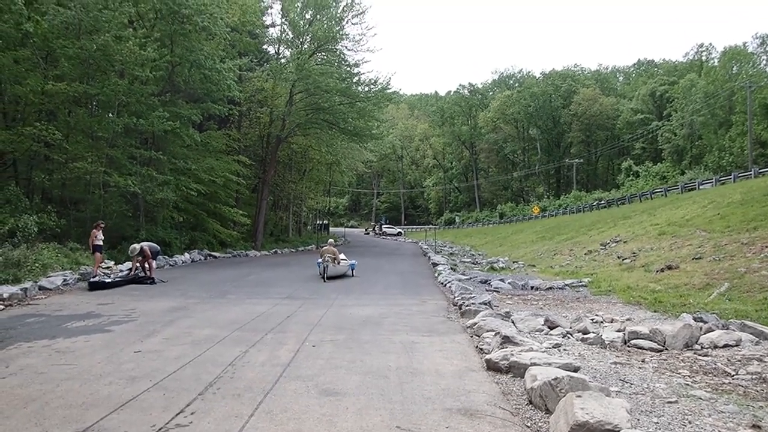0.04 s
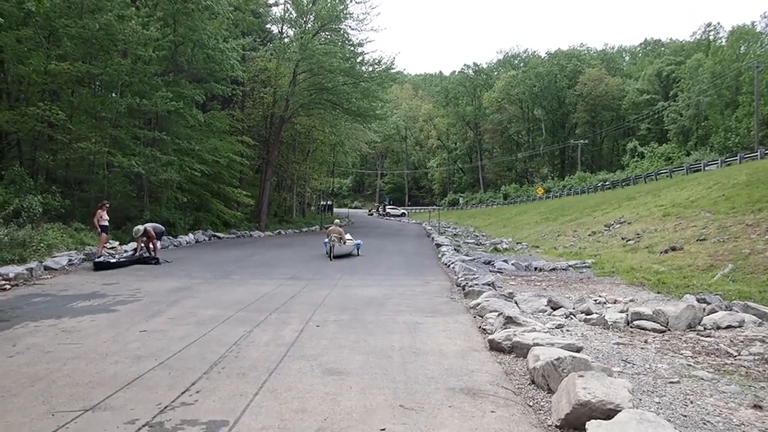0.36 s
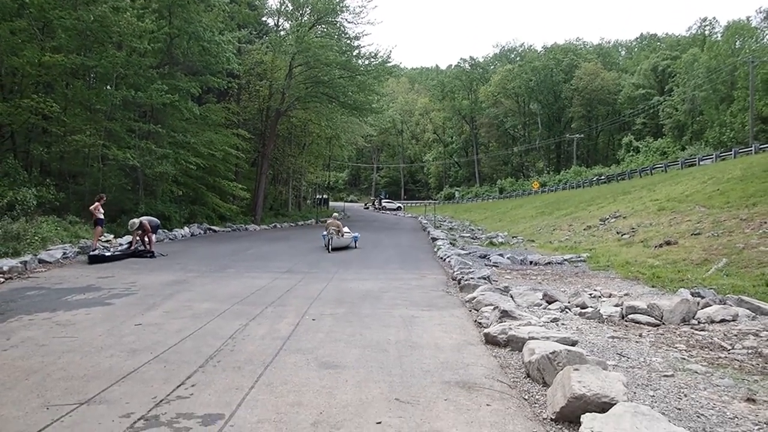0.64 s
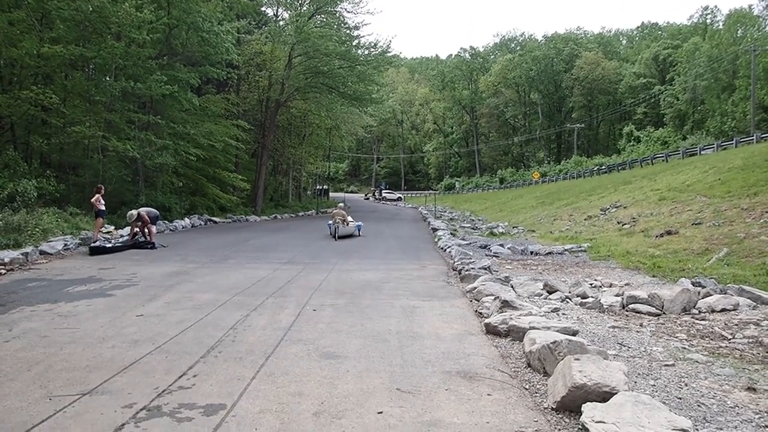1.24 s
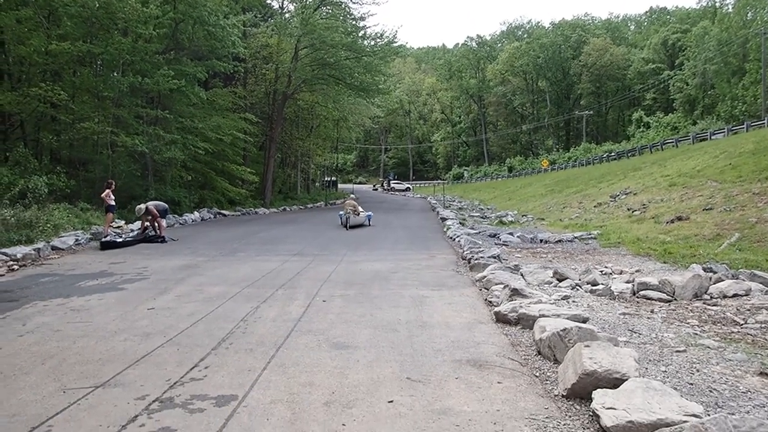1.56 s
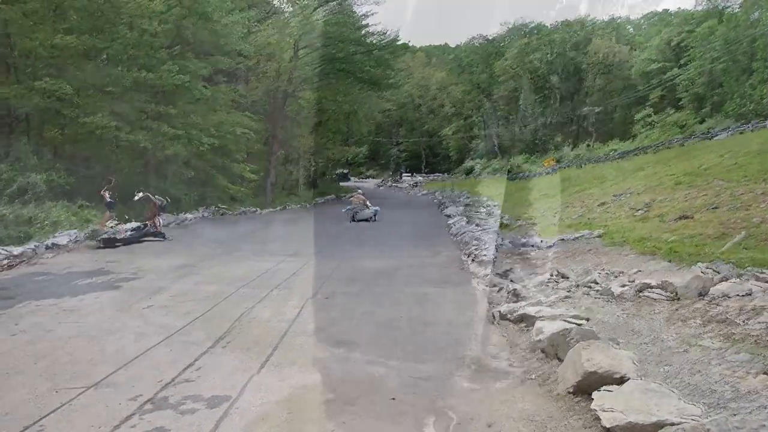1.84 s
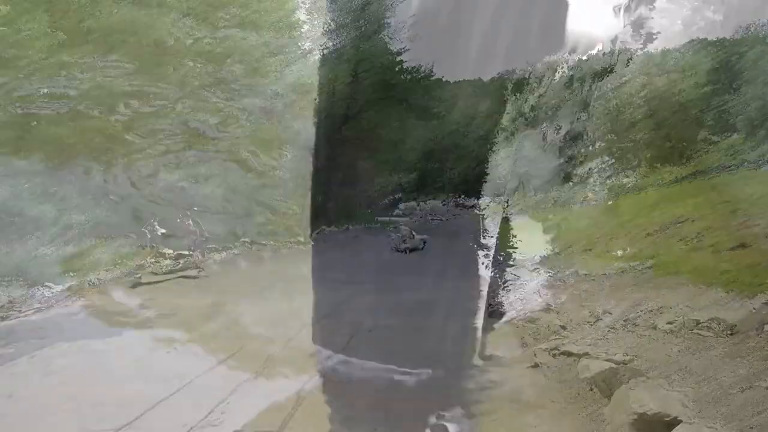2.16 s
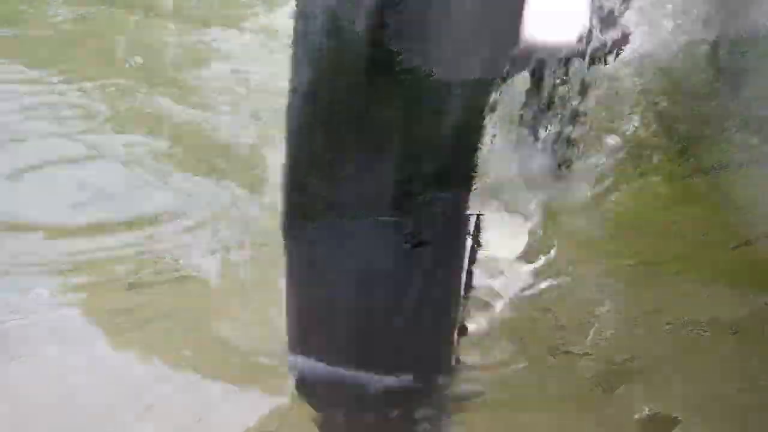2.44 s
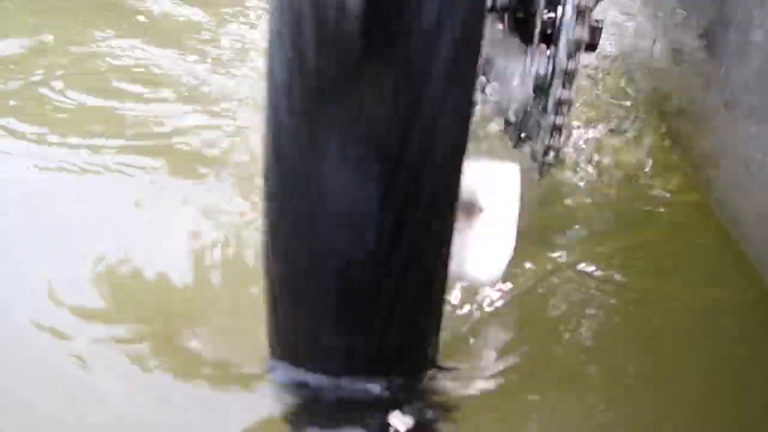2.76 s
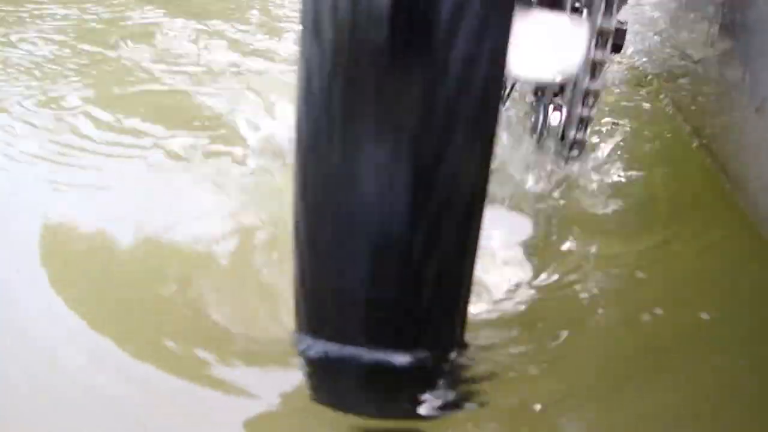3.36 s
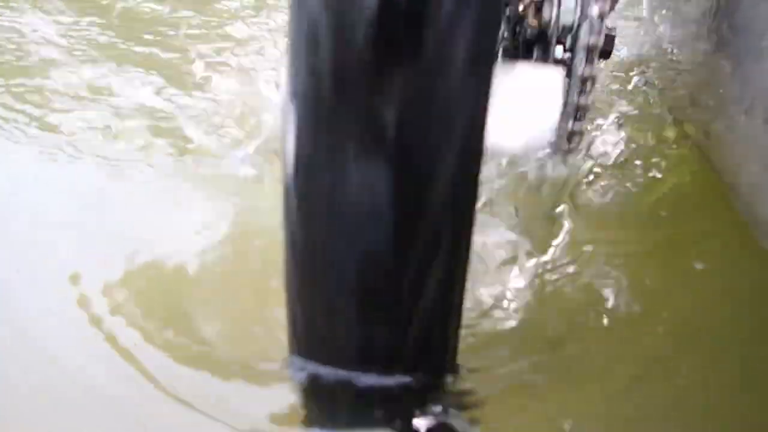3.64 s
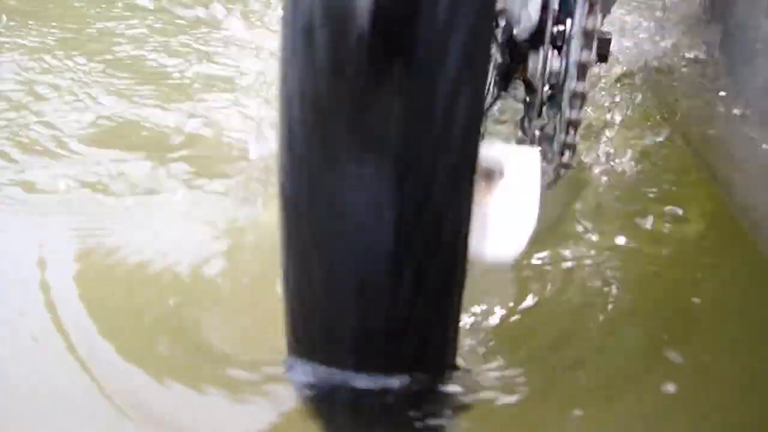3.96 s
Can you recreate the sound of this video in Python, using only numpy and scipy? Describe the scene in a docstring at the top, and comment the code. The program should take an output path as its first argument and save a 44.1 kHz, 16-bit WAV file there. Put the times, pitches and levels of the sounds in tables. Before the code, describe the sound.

A small craft's wheel churning water is the main sound. First the craft rolls on a ramp with a muffled rumble, throbbing about eight times a second and fading slightly, then stopping dead at 2 seconds. After a split second of silence, close splashing runs from 2.1 to 4 seconds, mostly on the right: irregular slaps, gulps, bubbles and spray over hollow hull drumming and the drive's low hum.

```python
"""A small wheeled craft churns water close by, mostly to the right. The water drums on its hollow hull
over the hum of the drive; wheel and chain throw up slaps and spray, which are impacts, and gulps
and bubbles, which are ringing pockets of air. Before this the craft rolls on a ramp for two seconds:
a muffled rumble whose rattle excites the body's resonances about eight times a second.
The rumble stops dead, and a short silence precedes the water."""
import sys
import numpy as np
from scipy import signal
from scipy.fft import rfft, irfft
from scipy.io import wavfile
from scipy.ndimage import uniform_filter1d

SR = 44100
rng = np.random.default_rng(int(sys.argv[2]) if len(sys.argv) > 2 else 0)


def bounce(signal):
    """Save signal as a 16-bit WAV file at the path given by the first command-line argument."""
    frames = np.transpose(np.atleast_2d(signal))
    limited = np.clip(frames, -1, 1)
    pcm = np.round(limited * 32767).astype(np.int16)
    wavfile.write(sys.argv[1], SR, pcm)


N = 176400

# Splashes off the wheel and chain: start_s, level_db, decay_s
WHEEL_SPLASHES = [(2.152, -13.5, 0.0036), (2.169, -18, 0.0065), (2.28, -23, 0.0043), (2.304, -19, 0.003),
                  (2.391, -22, 0.0031), (2.422, -16, 0.0098), (2.47, -22.5, 0.0078), (2.5024, -20, 0.0028),
                  (2.575, -17.5, 0.0032), (2.692, -24.5, 0.012), (2.745, -12, 0.0017),
                  (2.839, -18.5, 0.024), (2.961, -20, 0.004), (3.001, -20.5, 0.0075), (3.214, -22, 0.0062),
                  (3.25, -21, 0.028), (3.345, -21, 0.0055), (3.385, -18, 0.011), (3.527, -14.5, 0.0062),
                  (3.565, -21, 0.0065), (3.611, -12, 0.0025), (3.641, -23, 0.027), (3.651, -15, 0.002),
                  (3.779, -17.5, 0.011), (3.821, -18, 0.0045), (3.912, -13, 0.0051)]


def undb(db):
    """Amplitude ratio of a level in decibels."""
    return 10 ** (np.asarray(db) / 20)


def unit(x):
    """Normalisation to rms 1."""
    return x / np.sqrt(np.mean(x ** 2))


def on_bins(points):
    """Interpolation of (frequency_hz, value) points over log frequency, at every FFT bin."""
    hz, value = np.array(points, float).T
    order = np.argsort(hz)
    return np.interp(np.log(np.arange(N // 2 + 1) * SR / N + 1), np.log(hz[order]), value[order])


def colour(x, spectrum):
    """Minimum-phase filtering: folding the cepstrum makes the (frequency_hz, gain_db) response causal."""
    cepstrum = irfft(np.log(undb(on_bins(spectrum))), N)
    cepstrum[1:N // 2] *= 2
    cepstrum[N // 2 + 1:] = 0
    return irfft(rfft(x) * np.exp(rfft(cepstrum)), N)


def noise_gain(spectrum):
    """Rms gain of a filter for white noise, by Parseval's theorem."""
    return np.sqrt(np.mean(undb(on_bins(spectrum)) ** 2))


def walk(rate_hz):
    """Slow random modulation: smoothed random steps of rms 1."""
    hold = max(int(SR / rate_hz), 1)
    steps = np.repeat(rng.standard_normal(N // hold + 1), hold)
    return unit(uniform_filter1d(uniform_filter1d(steps, hold), hold)[:N])


def impacts(per_s, spread_db):
    """Shot noise: a Poisson train of impulses of uneven size and either sign, rms 1."""
    impulses = (rng.random(N) < per_s / SR) * rng.choice([-1, 1], N)
    return unit(impulses * undb(spread_db * np.minimum(rng.exponential(size=N), 4)))


def add(out, start_s, x):
    """Superposition of a short sound at its start time."""
    i = int(np.clip(start_s * SR, 0, N - 1))
    out[i:i + len(x)] += x[:N - i]


def bubble(hz, cycles, pitch_rise=0.069):
    """Damped oscillator: trapped air rings, rising in pitch as it decays by 40 dB."""
    age = np.linspace(0, 1, max(int(cycles / hz * SR), 2))
    turns = cycles * (age + pitch_rise * age ** 2 / 2)
    envelope = 1.84 * (1 - np.exp(-age / 0.089)) * np.exp(-np.log(100) * age)
    return envelope * np.sin(2 * np.pi * turns)


def hull_shadow(x, scatter_s=0.012, lag_samples=3):
    """Shadowing and scattering: the right faces the water; the left is shaded, late and partly diffuse."""
    # Left side relative to right: frequency_hz, gain_db
    shadow = [(60, 7), (110, -1.5), (200, -3.3), (300, -5.8), (700, -12), (1290, -17), (2380, -19),
              (4400, -20), (8120, -17), (15000, -26)]
    # Likeness of the two sides' phase: frequency_hz, likeness (1 = unscattered)
    phase_likeness = [(60, 0.69), (140, 0.55), (300, 0.56), (700, 0.13), (1500, 1), (3500, 0.056),
                      (12000, 0.088)]
    scatter = rfft(rng.standard_normal(N) * np.exp(-np.arange(N) / SR / scatter_s))
    diffuseness = 1 - np.clip(on_bins(phase_likeness), 0, 1)
    shade = undb(on_bins(shadow))
    right = rfft(x) * 2 / (1 + shade)
    left = right * shade * np.exp(1j * diffuseness * np.angle(scatter))
    return np.array([np.roll(irfft(left, N), lag_samples), irfft(right, N)])


def bubbles(fizz_count=600, low_hz=800, high_hz=3400, fizz_db=-39.5, cluster_s=0.01):
    """Bubble resonance: tight clusters of five clear rings over a fizz of faint ones."""
    # Bubble clusters: start_s, level_db, pitch_hz
    cluster_events = [(2.664, -18, 3090), (2.776, -16, 3430), (3.28, -16.5, 2900), (3.29, -23, 2830)]
    clusters, fizz = np.zeros(N), np.zeros(N)
    for start_s, db, hz in cluster_events:
        for late, detune in rng.random((5, 2)):
            ring = bubble(hz * np.exp(0.26 * (detune - 0.5)), cycles=20.4)
            add(clusters, start_s + late * cluster_s, undb(db) * ring)
    for when, pitch, faintness in rng.random((fizz_count, 3)):
        ring = bubble(low_hz * (high_hz / low_hz) ** pitch, cycles=16)
        add(fizz, when * N / SR, undb(-3 * np.log(faintness + 0.027)) * ring)
    return clusters + undb(fizz_db) * unit(fizz)


def droplets(count=520, low_hz=4480, high_hz=8620, scattered_db=-37):
    """Free oscillation: tiny drops ping at their own pitches, at random times and four to a splash."""
    def ping(pitch):
        return bubble(low_hz * (high_hz / low_hz) ** pitch, cycles=24)

    scattered, flung = np.zeros(N), np.zeros(N)
    for when, pitch, faintness in rng.random((count, 3)):
        add(scattered, when * N / SR, undb(-3 * np.log(faintness + 0.0054)) * ping(pitch))
    for start_s, db, decay_s in WHEEL_SPLASHES:
        for late, pitch in rng.random((4, 2)):
            add(flung, start_s + late * decay_s, undb(db - 7) * ping(pitch))
    return undb(scattered_db) * unit(scattered) + flung


def slosh(level_db=-31, surge_db=3):
    """Modulated shot noise: water tumbles round the tyre in uneven surges."""
    # Tumbling water: frequency_hz, gain_db
    spectrum = [(200, -20), (450, 5), (560, 9), (720, 7), (880, -5.5), (1050, 3), (1300, -2.5), (1500, 4.5),
                (1750, -7), (2400, -9), (4000, -41)]
    tumble = unit(colour(impacts(per_s=1800, spread_db=2), spectrum))
    return tumble * undb(level_db + surge_db * walk(35))


def spray(t, patter_db=-30.5, crackle_db=-34.5, attack_s=0.00082, drop_decay_s=0.0015):
    """Shot noise of drops: fine spray patters, bigger drops crackle, and each splash is a dense burst."""
    # Falling spray: frequency_hz, gain_db
    spectrum = [(600, -18), (1400, -18), (2200, -14), (2800, -7), (3650, -5.5), (4000, -17), (4400, -5.5),
                (4750, 0.5), (5350, 1), (6100, -2), (6650, -11), (7300, -8.5), (8100, -3.5), (9200, -20.5),
                (11600, -21), (13600, -16.5), (15500, -27)]
    patter = impacts(per_s=4500, spread_db=-0.5) * undb(patter_db + walk(60) + 2 * walk(20.6))
    big_drops = np.abs(impacts(per_s=110, spread_db=0.5))
    drop_tail = np.exp(-np.arange(SR // 20) / SR / drop_decay_s)
    envelope = undb(crackle_db) * unit(signal.fftconvolve(big_drops, drop_tail)[:N])
    for start_s, db, decay_s in WHEEL_SPLASHES:
        age_s = np.maximum(t - start_s, 0)
        envelope += undb(db) * (1 - np.exp(-age_s / attack_s)) * np.exp(-age_s / decay_s)
    bursts = envelope * impacts(per_s=7000, spread_db=1.3)
    return colour(patter + bursts, spectrum) / noise_gain(spectrum)


def slaps(t, decay_s=0.0017):
    """Impulsive excitation: a sheet of water hits the hull flat, and the brief force makes a wide-band crack."""
    # Hard slaps: start_s, level_db
    hits = [(2.152, -13), (2.283, -13.5), (2.418, -12), (2.538, -22.5), (2.778, -23), (3.110, -17),
            (3.183, -24), (3.246, -12), (3.643, -13.5), (3.911, -18)]
    # The crack: frequency_hz, gain_db
    spectrum = [(300, -24), (700, -5), (1500, 1), (3200, -6), (7000, -7), (15000, -19)]
    force = sum(undb(db) * (t >= start_s) * np.exp(-np.abs(t - start_s) / decay_s) for start_s, db in hits)
    return colour(force * rng.choice([-1, 1], N), spectrum) / noise_gain(spectrum)


def gulps(breakup_s=0.013, detune=0.43, plop_hz=633, cycles=7.8):
    """Cavity collapse: an air pocket plops and breaks into one strong bubble and five weaker followers."""
    # Air dragged under: start_s, level_db, pitch_hz
    pockets = [(2.138, -8.5, 1200), (2.150, -10, 1120), (2.233, -17, 1070), (2.255, -15, 1400),
               (2.279, -5.5, 1235), (2.391, -13, 820), (2.419, -6, 784), (2.538, -8.5, 1110),
               (2.691, -11.5, 1090), (2.778, -13, 930), (2.96, -10, 1120), (3.11, -9, 1020),
               (3.183, -13, 890), (3.218, -11.5, 1250), (3.245, -7.5, 1150), (3.345, -15, 1140),
               (3.373, -10, 1560), (3.463, -12, 1390), (3.508, -19, 810), (3.629, -9.5, 1430),
               (3.728, -12.5, 1230), (3.912, -8.5, 930)]
    out = np.zeros(N)
    for start_s, db, hz in pockets:
        ring_db, plop_db = db - 2.5, db - 8
        add(out, start_s, undb(ring_db) * bubble(hz, cycles))
        plop_s = start_s + breakup_s * rng.random() / 2
        plop = bubble(plop_hz * np.exp(detune * (rng.random() - 0.5)), cycles=7.4)
        add(out, plop_s, undb(plop_db) * plop)
        for late, pitch, faintness in rng.random((5, 3)):
            follower = bubble(hz * np.exp(detune * (2 * pitch - 1)), cycles)
            add(out, start_s + late * breakup_s, undb(ring_db - 7 * (faintness + late)) * follower)
    return out


def drive(t, pitch_hz=151.5, waver=0.0018):
    """Harmonic series: the drive hums at a nearly steady speed and swells a little with the load."""
    # Partials of the hum: harmonic_number, relative_db
    harmonics = [(1, -12), (2, 0.5), (3, -16.5)]
    # Swell of the hum: time_s, level_db
    swell = [(2.13, -21), (2.54, -17), (2.78, -22.5), (2.93, -15.5), (3.1, -20), (3.28, -22), (3.36, -17.5),
             (3.58, -19.5), (3.98, -23.5)]
    phase = 2 * np.pi * np.cumsum(pitch_hz * (1 + waver * walk(12.42))) / SR
    hum = np.sqrt(2) * sum(undb(db) * np.sin(number * phase) for number, db in harmonics)
    return hum * undb(np.interp(t, *np.array(swell).T))


def ramp_rumble(t, roll_db=-26.5, ring_width_hz=25.3, ring_db=14.5, muffle_hz=2810):
    """Modal resonance: over dull rolling noise, throbs of rattle ring the craft's hollow body."""
    # Throbs: centre_s, level_db, half_width_s, ring_hz
    throbs = [(0.026, -17.5, 0.022, 354), (0.15, -20, 0.014, 346), (.274, -18, 0.011, 360),
              (.415, -21, 0.021, 348), (.534, -18, 0.011, 386), (0.674, -22.5, .017, 357),
              (0.803, -22, 0.022, 397), (.932, -23, 0.02, 423), (1.07, -22.5, 0.028, 411),
              (1.193, -23, 0.019, 343), (1.314, -21, 0.022, 393), (1.453, -23, 0.021, 393),
              (1.577, -23, 0.023, 409), (1.711, -23.5, 0.017, 365), (1.831, -22, 0.024, 428),
              (1.949, -25, .016, 358)]
    # Upper body modes, changing as the craft moves away: pitch_hz, width_hz, gain_db, slope_db_per_s
    upper_modes = [(462, 60, 3.5, 4), (700.6, 32, 13, -3), (830, 21, 4, 5)]
    # The rattle: frequency_hz, gain_db
    rattle_spectrum = [(60,-47.5),(150,-13),(280,-7.5),(600,-9.5),(900,-14),(1400,-17),(2100,-20.5),(2550,-33.5),(4200,-54.5)]
    # Rolling noise: frequency_hz, gain_db
    roll_spectrum = [(20, -31), (64, -6), (108, -6.5), (165, -2), (270, -1), (440, -4), (606, -11),
                     (821, -6), (2000, -21.5), (2600, -34.5), (3200, -32.5), (4160, -67.5)]
    rattle = colour(impacts(per_s=3000, spread_db=0.7), rattle_spectrum)
    rumble = undb(roll_db) * unit(colour(rng.standard_normal(N), roll_spectrum))
    for centre_s, db, half_width_s, ring_hz in throbs:
        detune = np.exp(0.018 * rng.standard_normal())
        modes = [(ring_hz, ring_width_hz, ring_db)]
        modes += [(hz * detune, width, gain + slope * centre_s) for hz, width, gain, slope in upper_modes]
        body = rattle.copy()
        for hz, width_hz, gain_db in modes:
            body += (undb(gain_db) - 1) * signal.lfilter(*signal.iirpeak(hz, hz / width_hz, SR), rattle)
        power = np.exp(-((t - centre_s) / half_width_s) ** 2 / 2)
        rumble += undb(db) * body * np.sqrt(power / np.average(body ** 2, weights=power))
    muffled = signal.sosfilt(signal.butter(8, muffle_hz, fs=SR, output="sos"), rumble)
    left_ratio = undb(-10.5 - 2 * t)  # the sound drifts further to the right
    return np.array([left_ratio * muffled, muffled]) * 2 / (1 + left_ratio)


def hull_drumming(t, gain_db=2.5):
    """Forced vibration: churned water knocks on the hollow hull, which responds at its low resonances."""
    # Response of the hull: frequency_hz, gain_db
    response = [(25, -50), (69, -23), (105, -21), (133, -10), (153, 0.5), (200, -3), (278, -3), (303, -8.5),
                (335, -6), (378, -8), (420, -11), (475, -14), (530, -26.5), (900, -28.5), (2000, -74)]
    # Strength of the churning: time_s, level_db
    churn = [(2.12, -21), (2.444, -20.5), (2.496, -15), (2.626, -25.5), (2.684, -18.5), (3.14, -19.5),
             (3.166, -23), (3.214, -20), (3.392, -21), (3.476, -16), (3.664, -25), (3.742, -15),
             (3.842, -23), (4.0, -17.5)]
    knocks = unit(colour(impacts(per_s=1600, spread_db=1), response))
    return knocks * undb(gain_db + np.interp(t, *np.array(churn).T))


def scene(ramp_end_s=1.985, water_start_s=2.114, edge_s=0.002):
    """The rumble on the ramp, a short silence, then the superposed sounds of the craft in the water."""
    t = np.arange(N) / SR
    water = drive(t) + hull_drumming(t) + gulps() + slaps(t) + bubbles() + slosh() + spray(t) + droplets()
    ramp_gate = np.clip((ramp_end_s - t) / edge_s, 0, 1)
    water_gate = np.clip((t - water_start_s) / edge_s + 0.5, 0, 1)
    return hull_shadow(water) * water_gate + ramp_rumble(t) * ramp_gate


def record(dry, cutoff_hz=15750):
    """Clipping and band limiting: peaks stop at full scale and a steep low-pass cuts the top."""
    return signal.sosfilt(signal.ellip(10, 0.2, 80, cutoff_hz, fs=SR, output="sos"), np.clip(dry, -1, 1))


dry = scene()
out = record(dry)
bounce(out)
```